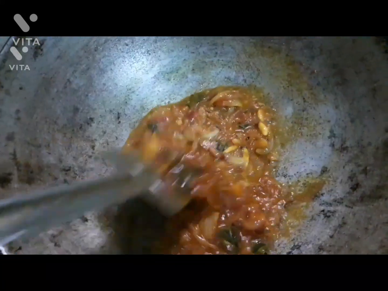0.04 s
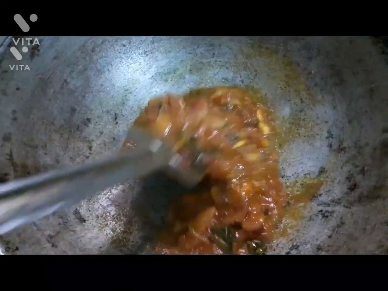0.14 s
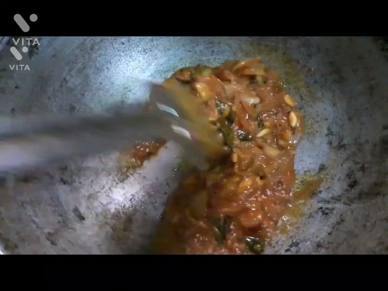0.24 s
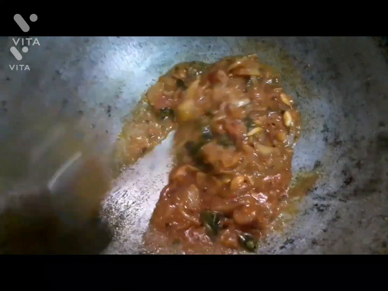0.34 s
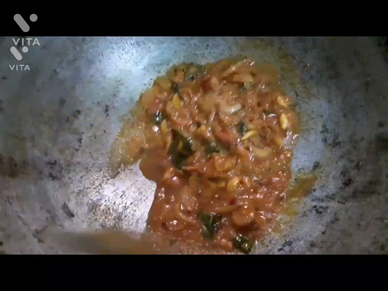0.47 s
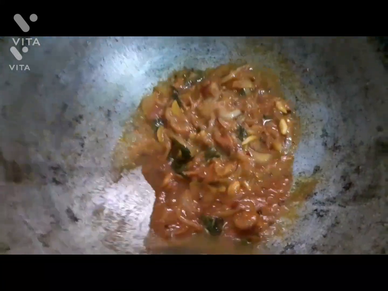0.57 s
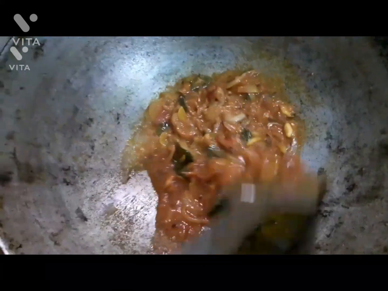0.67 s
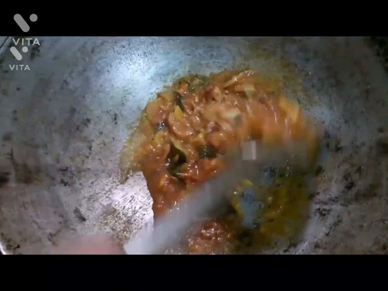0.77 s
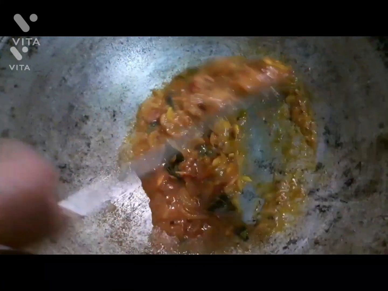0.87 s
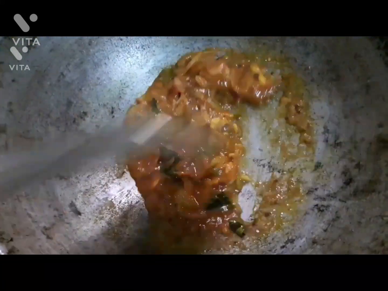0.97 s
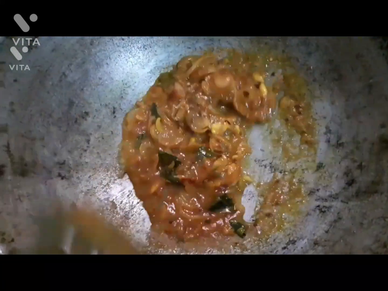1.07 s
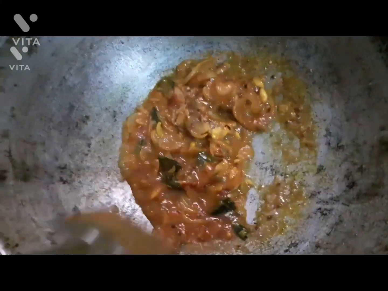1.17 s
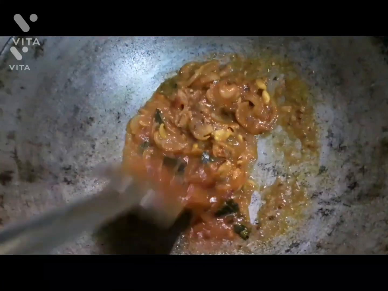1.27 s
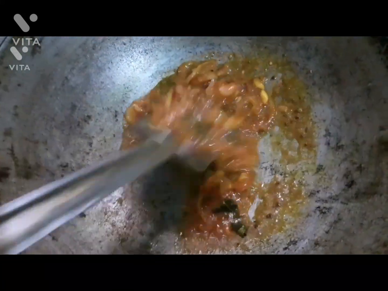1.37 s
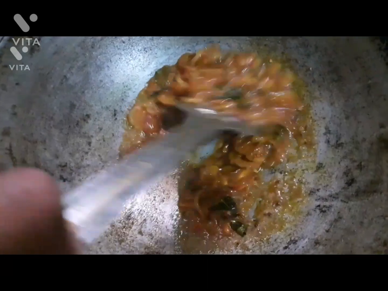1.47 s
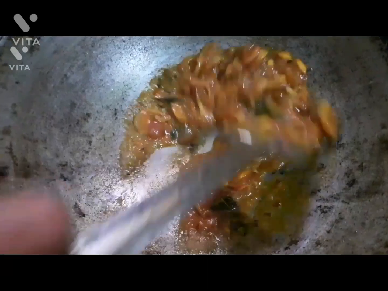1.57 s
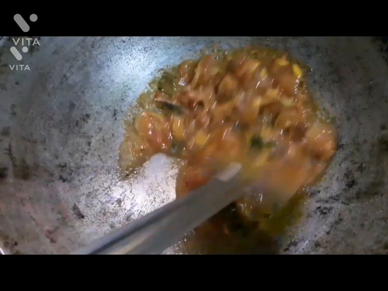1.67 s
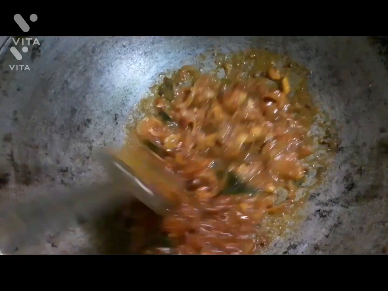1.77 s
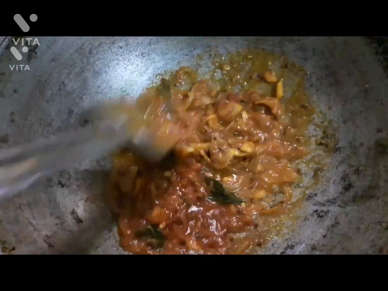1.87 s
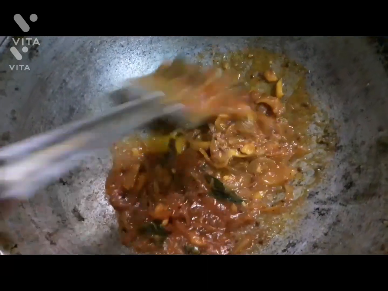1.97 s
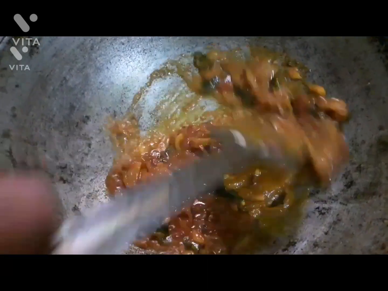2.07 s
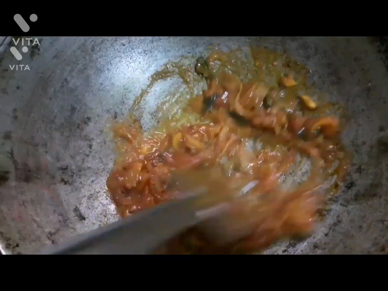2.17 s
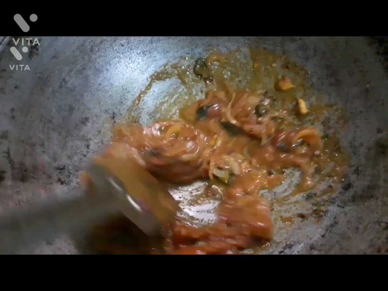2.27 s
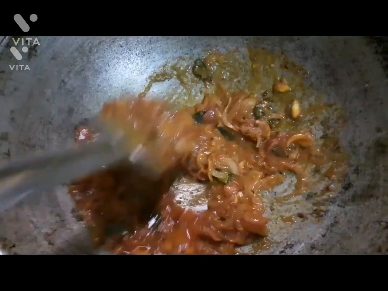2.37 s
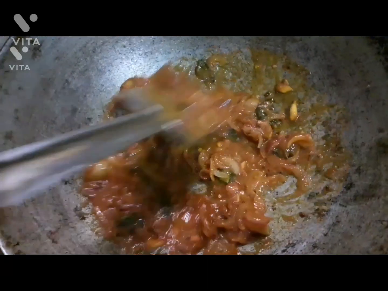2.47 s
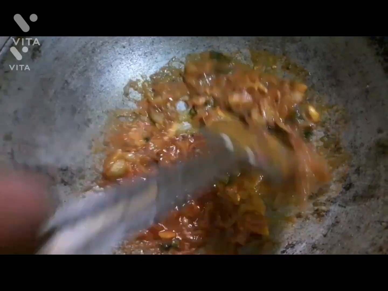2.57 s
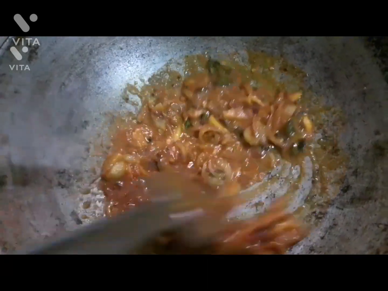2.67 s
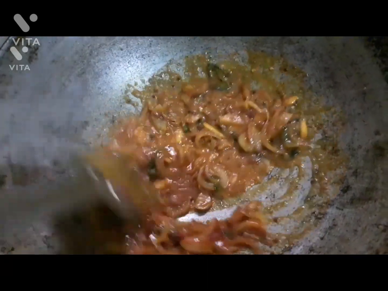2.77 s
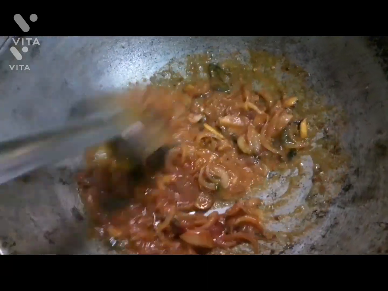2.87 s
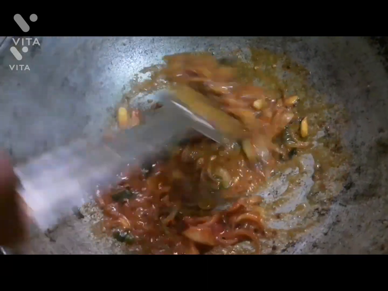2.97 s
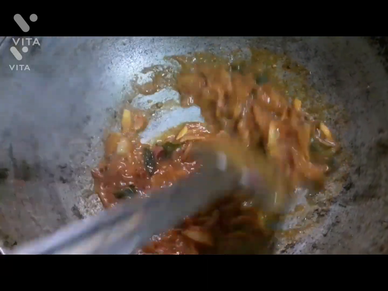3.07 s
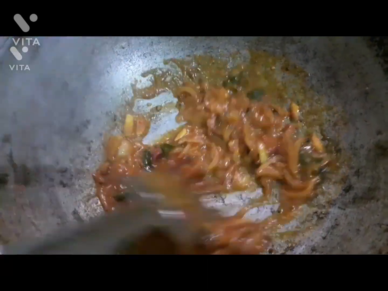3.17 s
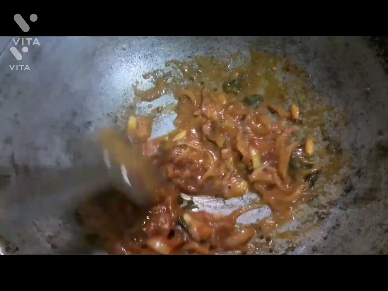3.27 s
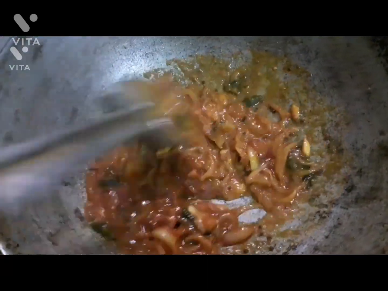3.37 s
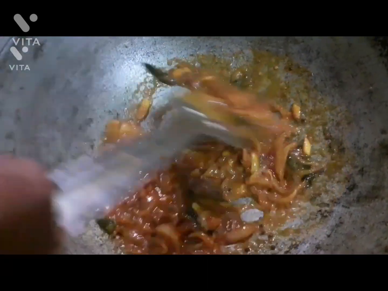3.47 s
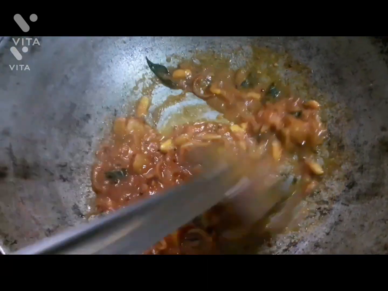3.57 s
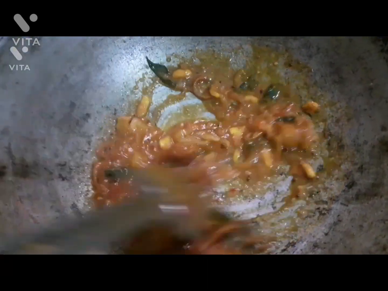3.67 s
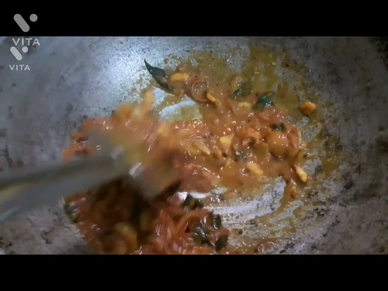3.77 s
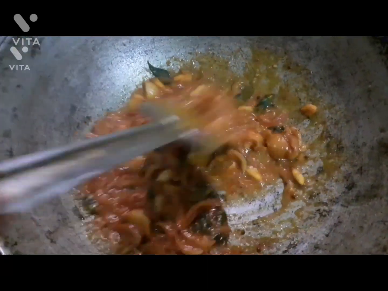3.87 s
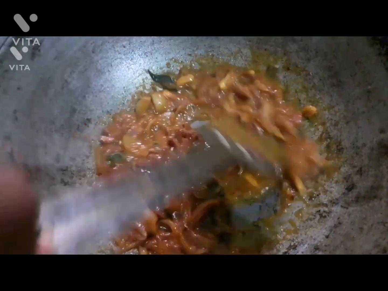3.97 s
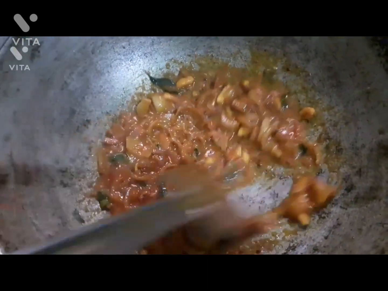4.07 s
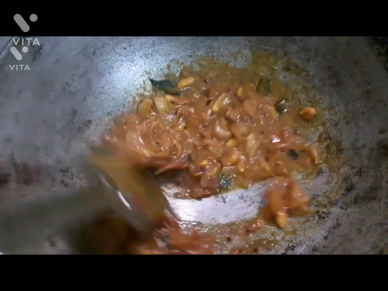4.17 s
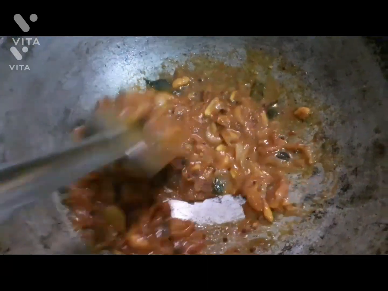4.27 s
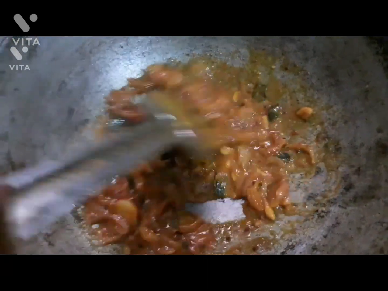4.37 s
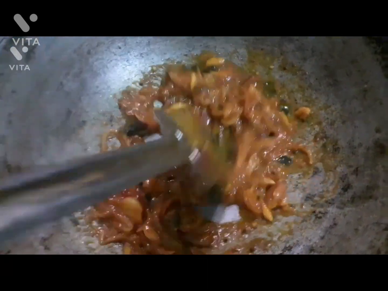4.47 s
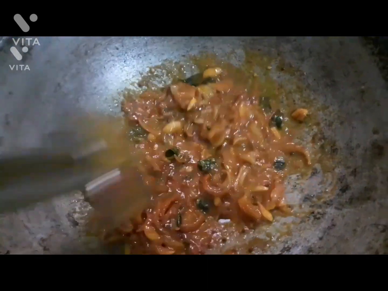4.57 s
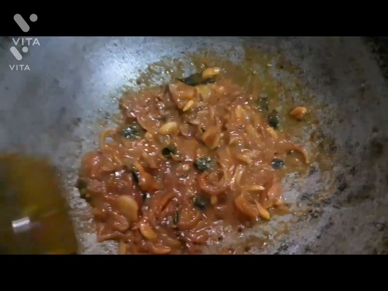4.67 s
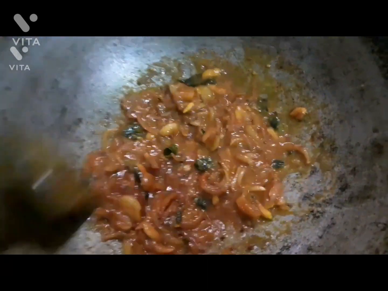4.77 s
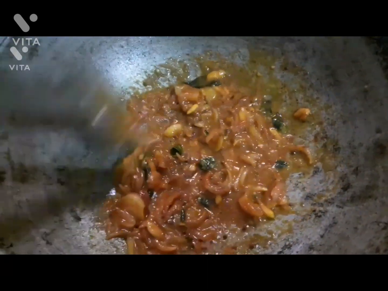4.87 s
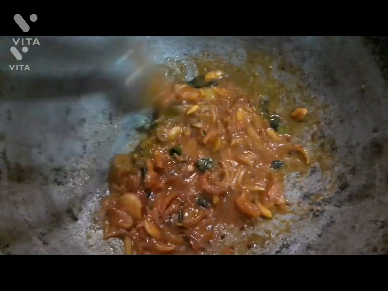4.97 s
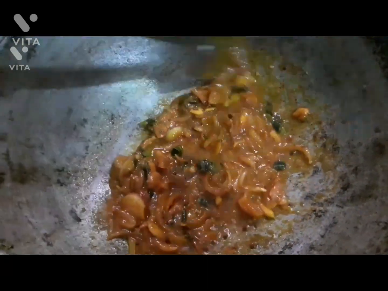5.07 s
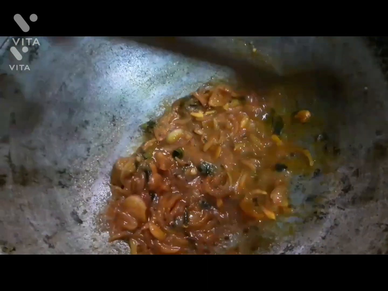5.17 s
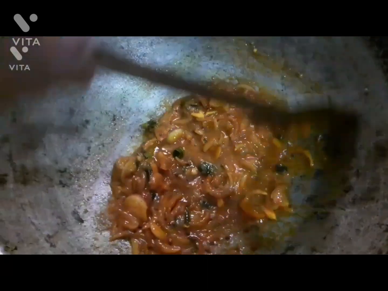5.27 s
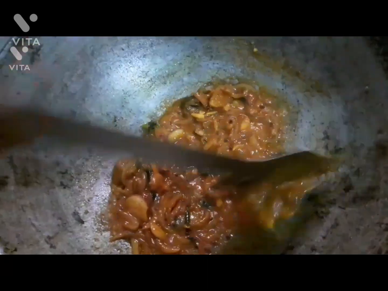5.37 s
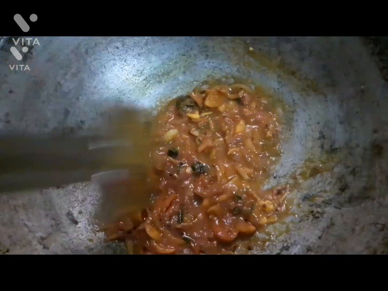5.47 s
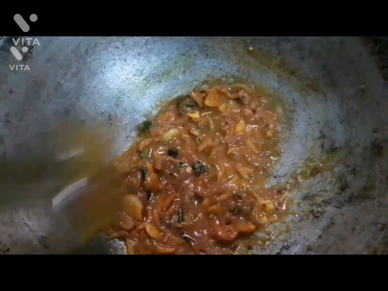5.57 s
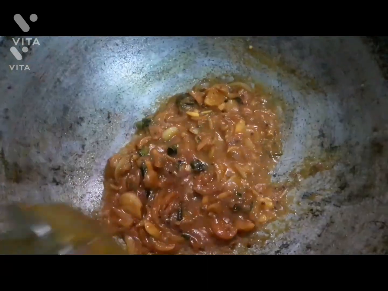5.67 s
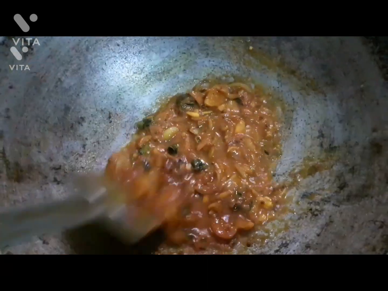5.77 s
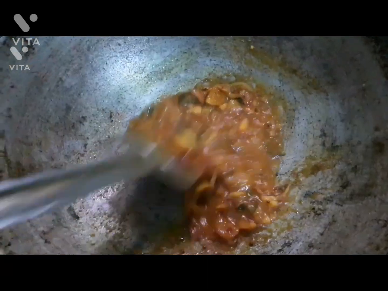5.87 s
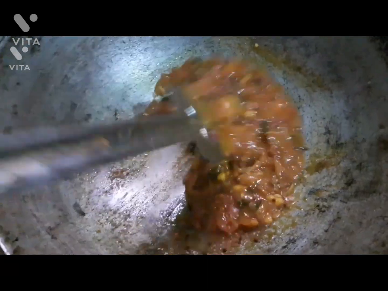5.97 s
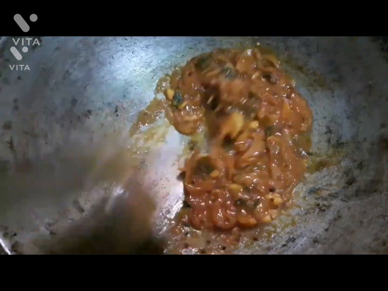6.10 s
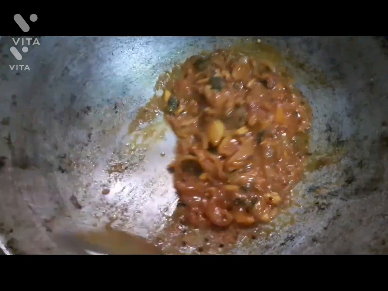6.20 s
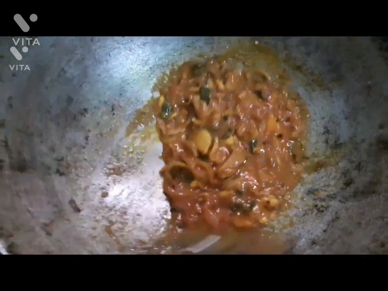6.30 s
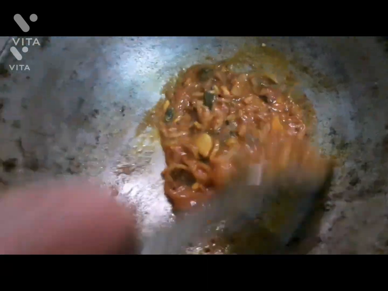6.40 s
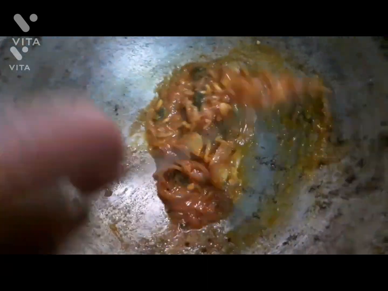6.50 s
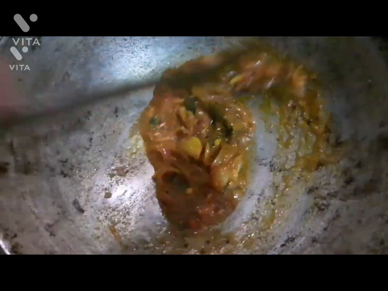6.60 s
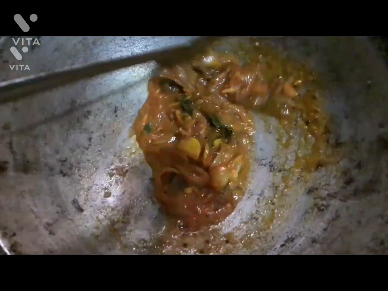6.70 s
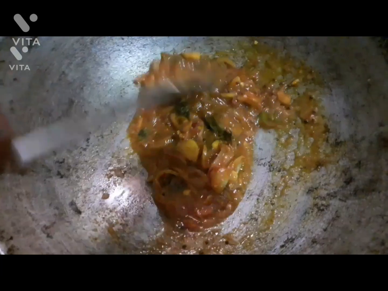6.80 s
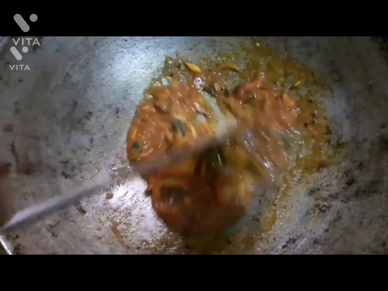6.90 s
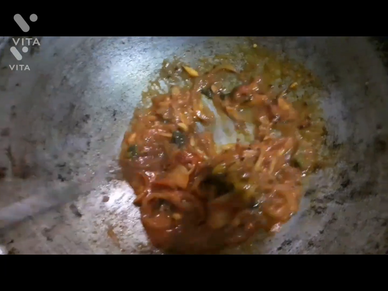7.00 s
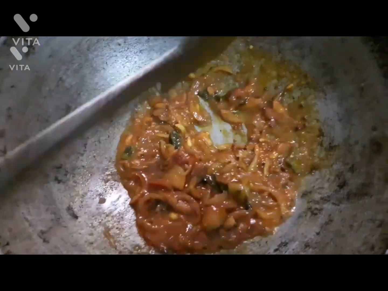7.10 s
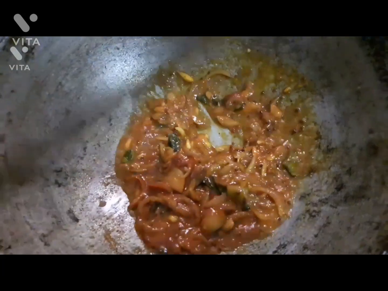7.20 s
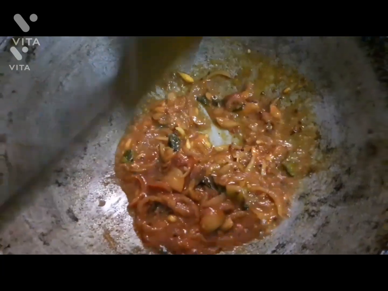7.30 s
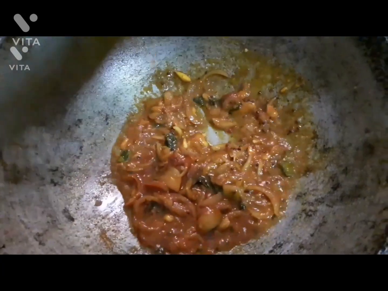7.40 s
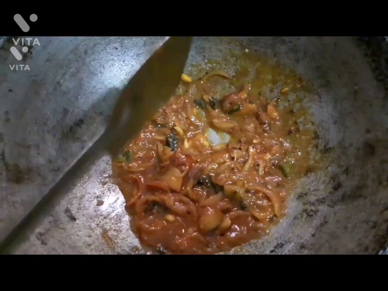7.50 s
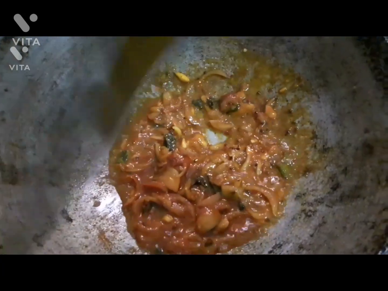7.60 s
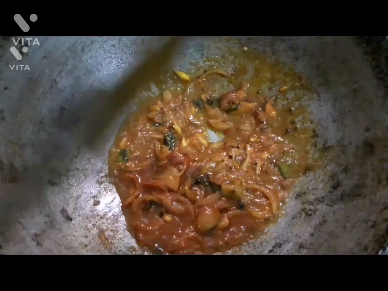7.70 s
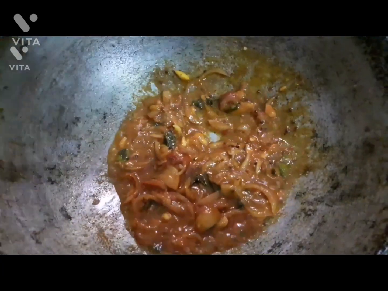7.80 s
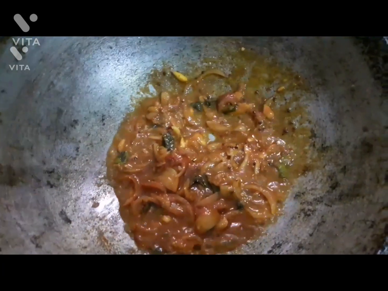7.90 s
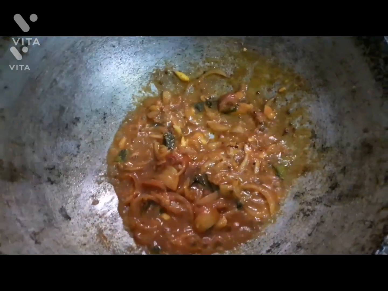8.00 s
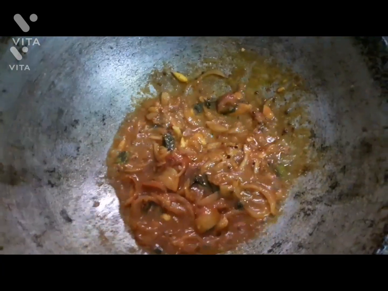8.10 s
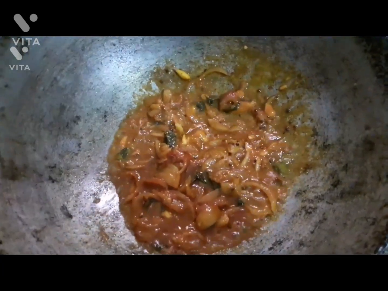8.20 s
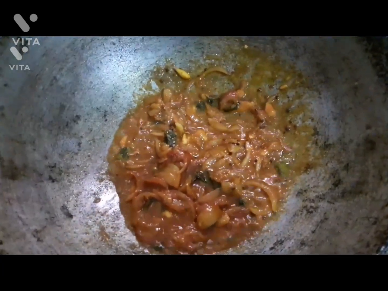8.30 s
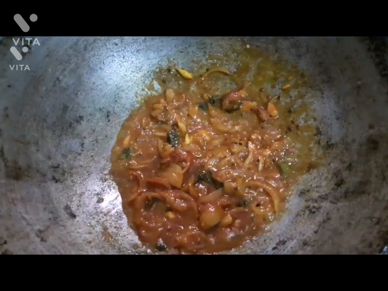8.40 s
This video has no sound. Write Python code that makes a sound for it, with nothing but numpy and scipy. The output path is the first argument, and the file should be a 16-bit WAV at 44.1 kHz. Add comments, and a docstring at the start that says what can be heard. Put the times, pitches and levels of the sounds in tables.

```python
"""Wet spice paste sizzles in a hot wok, heard close through two ports: bubble bursts, clicks and hiss. A steel
spatula drags grit over the metal as noise coloured by the wok's modes, above a low stove rumble. It knocks the
pan (dull push, low modes), clinks on it (crack, thin blade modes), squeaks in gliding tones and twice judders
in stick-slip pulses. Freshly turned paste hisses louder, then settles."""
import sys
import numpy as np
from scipy import signal
from scipy.fft import rfft, irfft, next_fast_len
from scipy.io import wavfile
from scipy.ndimage import uniform_filter1d

SR = 44100
rng = np.random.default_rng(int(sys.argv[2]) if len(sys.argv) > 2 else 0)


def amplitude_ratio(level_db):
    """Convert a level in decibels to the matching linear amplitude (field) ratio."""
    exponent = np.asarray(level_db, float) / 20
    return 10 ** exponent


def digitize_waveform(pressure):
    """Quantize a signal to 16-bit integers and store it at the path in sys.argv[1].

    Rows of a 2-D input are taken as channels; values are limited to [-1, 1].
    """
    field = np.atleast_2d(pressure).T
    bounded = np.clip(field, -1, 1)
    quanta = np.round(bounded * 32767).astype(np.int16)
    wavfile.write(sys.argv[1], SR, quanta)


N = 372644

# Steady frying of the paste. Each row: time in seconds, bursting bubbles in dB, fine fizz in dB.
STEADY_FRYING = [(0.0, -33, -37), (0.3, -37, -41.5), (0.55, -35.5, -41), (1.0, -38.5, -40.5),
                 (1.45, -37, -40), (1.72, -30.5, -39), (1.95, -30, -32.5), (2.15, -29, -33),
                 (2.5, -28.5, -30.5), (3.0, -30.5, -32.5), (3.6, -31.5, -35), (4.0, -30.5, -33),
                 (4.55, -34.5, -34), (4.9, -34, -36), (5.3, -41.5, -41), (5.48, -38, -41),
                 (6.05, -39, -43.5), (6.6, -38.5, -41.5), (7.0, -36.5, -41), (7.5, -35, -41),
                 (8.45, -35, -41.5)]
# Wet paste turned onto hot metal flares up. Each row: start in seconds, rise in seconds, bubbles in dB,
# fizz in dB, fade in dB per second.
FLARES = [(.53, 0.021, -39, -57, 56), (1.2, 0.059, -34, -54, 44), (1.76, 0.029, -22.5, -35.5, 72),
          (2.05, 0.021, -33, -48, 43), (2.24, 0.056, -24, -32, 49), (2.75, 0.033, -24.5, -30, 90),
          (3.18, .05, -30.5, -33.5, 53), (3.5, 0.037, -33, -36, 60), (3.67, 0.069, -28.5, -28.5, 72),
          (4.14, 0.046, -28.5, -44, 54), (4.64, 0.033, -36.5, -36, 30), (5.16, 0.059, -35.5, -43, 37),
          (5.74, 0.048, -35.5, -50, 80), (5.84, 0.021, -41, -51, 108), (6.27, 0.055, -34, -42, 92),
          (6.735, .02, -52, -52, 37), (6.755, 0.029, -36, -48, 67)]
# The blade scrapes over the metal. Each row: start in seconds, rise in seconds, drag into the wok in dB,
# hiss of the edge in dB, fade in dB per second.
SCRAPES = [(.04, 0.03, -43.5, -47, 51), (.37, 0.03, -52, -37, 45), (.6, 0.034, -46, -47, 55),
           (1.05, 0.043, -49, -50, 50), (1.2, 0.078, -48.5, -45, 23), (1.33, 0.044, -47, -58, 40),
           (2.16, 0.058, -48, -40, 50), (2.25, 0.03, -49, -32, 47), (3.7, .05, -52, -47, 40),
           (4.18, 0.064, -52, -35, 66), (4.27, 0.086, -44.5, -55, 47), (4.65, 0.043, -47.5, -40, 33),
           (4.92, 0.061, -41.5, -39.5, 48), (5.03, 0.026, -33.5, -52, 98), (5.1, .04, -45.5, -46, 33),
           (5.52, .02, -46, -39.5, 27), (5.7, 0.083, -49, -35.5, 93), (5.83, 0.043, -42, -62, 54),
           (6.12, 0.11, -47, -38.5, 45), (6.3, 0.044, -45.5, -53, 58), (6.73, 0.0074, -37.5, -37, 72),
           (6.77, 0.022, -55, -59, 43)]
# The stove is jolted and rumbles. Each row: start in seconds, level in dB.
STOVE_JOLTS = [(.06, -52), (.35, -50), (.59, -49), (.9, -63), (1.03, -53), (1.17, -69), (1.37, -53),
               (1.71, -53), (1.79, -51), (2.19, -51), (2.45, -58), (2.68, -59), (2.91, -53), (3.14, -56),
               (3.22, -60), (3.45, -61), (3.6, -55), (3.88, -53), (4.05, -53), (4.25, -52), (4.36, -59),
               (4.48, -53), (4.62, -49.5), (4.8, -68), (4.94, -55), (5.03, -54), (5.15, -55), (5.25, -59),
               (5.36, -58), (5.5, -47), (5.65, -58), (5.84, -49), (6.09, -50), (6.22, -53), (6.36, -54),
               (6.71, -58), (6.9, -58), (7.3, -65), (7.78, -73), (7.9, -63), (8.03, -73)]
# The wok is knocked on its stand. Each row: start in seconds, peak in dB, centre of the ring in Hz,
# spread in octaves, rise in seconds, ring time as a factor on t60.
KNOCKS = [(0.109, -30.5, 397, 0.73, 0.0097, 1.1), (0.377, -31, 380, 0.82, 0.0016, 0.73),
          (0.61, -29.5, 600, 0.4, 0.0026, 0.49), (1.045, -36, 368, 0.92, 0.0045, 1.1),
          (1.365, -34, 263, 1.2, 0.0053, 0.56), (1.795, -28.5, 550, 0.39, 0.0061, 1),
          (3.374, -26.5, 880, 0.12, 0.0047, 0.36), (3.631, -38, 417, .3, 0.0032, 0.34),
          (4.284, -44, 660, .5, .003, .8), (4.641, -34, 405, 0.81, 0.011, 1.1),
          (4.748, -36, 690, 0.78, 0.0064, 0.68), (5.085, -32.5, 350, .3, .01, .5),
          (5.13, -38, 383, .15, .03, .6), (5.245, -36.5, 388, .2, 0.0096, .3),
          (5.514, -32.5, 380, 0.52, 0.0025, 2.4), (5.889, -29.5, 408, 0.82, 0.0028, 0.5),
          (5.892, -30, 1350, 0.4, 0.003, 0.21), (6.114, -37.5, 317, 0.32, 0.0033, 0.89),
          (6.7301, -9, 895, 0.92, 0.00031, 0.2), (6.739, -28, 550, .8, 0.011, .5)]
# The blade edge strikes the pan. Each row: start in seconds, peak in dB, centre of the ring in Hz,
# spread in octaves, crack against the ring in dB, ring time as a factor on t60.
CLINKS = [(0.3778, -14.5, 11800, 0.45, -1, .8), (0.3783, -13.5, 3500, 0.65, 5, 0.5),
          (0.61, -20, 4600, .7, 11, .6), (1.052, -19, 3980, 0.96, 10, .5), (1.235, -22, 4730, 0.2, 3, 0.62),
          (4.6476, -12.5, 5600, 0.67, 6, 0.88), (4.679, -15, 5400, 0.49, 3, .5),
          (4.727, -21, 4800, 0.23, -2, .7), (4.998, -20.5, 4900, 0.52, -7, 0.75),
          (5.516, -5, 7300, 1.7, -2, 0.74), (6.119, -7.5, 8200, 1.6, 5.5, 1),
          (6.73, -12, 4770, 0.71, 3, 0.33), (6.819, -19, 3500, 0.4, 4, .4)]
# The blade sings as it slides, one list a squeak. Each row: time in seconds, pitch in Hz, rms level in dB.
SQUEAKS = [
    [(4.90, 1156, -40), (4.925, 1198, -38), (4.95, 1197, -37), (4.968, 1100, -39), (4.99, 1040, -36),
     (5.003, 900, -38), (5.02, 740, -36), (5.04, 680, -43)],
    [(4.905, 856, -48), (4.93, 880, -43), (4.955, 880, -50)],
    [(5.11, 1148, -42), (5.13, 1253, -38), (5.155, 1148, -40), (5.178, 1288, -38), (5.2, 1152, -41),
     (5.25, 1106, -43)],
    [(5.115, 2635, -39), (5.13, 2640, -32), (5.142, 2644, -36), (5.153, 2670, -29.5), (5.175, 2740, -39),
     (5.192, 2810, -36), (5.21, 2870, -30.5), (5.25, 2790, -39)],
    [(5.765, 3670, -45), (5.785, 3860, -33), (5.815, 3920, -43)],
    [(5.85, 3500, -46), (5.875, 3700, -32), (5.915, 3770, -43)],
]
# The blade chatters over bare metal, slowly low in the bowl, then fast on the near wall. Each row: start in
# seconds, length in seconds, rms level in dB, slips per second at the slowest before unevenness, added
# left-right tilt in dB, unevenness, grit between slips (0-1), ring of the bowl in dB.
JUDDERS = [(5.026, .075, -27, 215, 4.5, .3, 0.012, 1.5), (6.343, 0.043, -22, 1300, 32, 7.3, 0.9, -28)]
# Colour of each judder, one list for each row above. Each row: frequency in Hz, level in dB.
JUDDER_COLOURS = [
    [(40, -73), (120, -22), (200, -7.5), (340, -6), (500, -1), (650, -1), (900, 1), (1250, 2.5),
     (1450, 0.5), (1650, 6), (2000, -23), (4000, -46), (16000, -68)],
    [(60, -75), (250, -23), (600, -12), (800, -3), (1000, -5.5), (1400, 2), (1650, -2), (1900, -1.5),
     (2500, 1.2), (3300, 0), (4500, -9.5), (6000, -14), (7500, -52), (16000, -47)],
]
# Ringing modes of the blade, then of the wok. Each row: pitch in Hz, relative level in dB, t60 in seconds.
BLADE_MODES = [(2900, -8, .05), (3720, -6, .05), (4800, -4, .06), (5380, 3, .1), (5720, 2, .12),
               (6035, 5, .075), (6310, 4, .06), (6650, 2, .075), (7100, -3, .08), (8090, 2, .05),
               (9390, -3, .15), (9535, 2, .18), (11900, -5, .07), (12320, 5, .065), (12810, 2, .05),
               (13900, 0, .03)]
WOK_MODES = [(123, 0, 0.36), (225.3, -2, 0.6), (261.7, 5, 0.37), (346, -12, 0.78), (380, -0.5, 0.39),
             (413, -1, 0.35), (483, -4.5, 0.059), (550, -8.5, 0.094), (641.4, -1.5, 0.12), (690, -8, 0.19),
             (883, -4, 0.28), (1006, -1.5, 0.26), (1120, -5.5, 0.12), (1252, 1.5, 0.16), (1326, 1, 0.24),
             (1470, 1, 0.18), (1615, 5, 0.22)]
# The bowl lifts and dents the sizzle inside it. Each row: centre in Hz, width in Hz, lift in dB.
HOLLOW_BUMPS = [(825, 20, 1), (1358, 140, 4), (1630, 90, -3.5), (2452, 243, 4.5), (3050, 334, 4.5),
                (3615, 114, 4.5), (4050, 930, 1.5), (4900, 170, 1.4), (6300, 240, -3)]
# Colour of each channel; the left peaks near 3.2 kHz and has a deep gap near 8.2 kHz. Each row: frequency in
# Hz, level in dB.
LEFT_COLOUR = [(30, -26), (80, -25.5), (200, -22), (600, -11), (1300, -8.5), (1900, -5), (2500, -4.5),
               (3200, -0.5), (3900, -2.5), (5000, -8), (6500, -15), (7500, -23), (8250, -61), (9100, -24.5),
               (12000, -16), (15700, -14.5)]
RIGHT_COLOUR = [(30, -34), (80, -32), (200, -25), (600, -15), (1300, -13.5), (2500, -15.5), (3200, -19),
                (4500, -12.5), (6500, -14), (7600, -15), (8500, -18), (9200, -13.5), (15700, -12.5)]
# How alike the ports hear. Each row: frequency in Hz, left-right likeness (0-1).
PORT_LIKENESS = [(60, 0.57), (300, 0.88), (900, 0.72), (1800, 0.19), (3500, 0.093), (5500, 0.21),
                 (6500, 0.14), (7300, 1), (8200, 0.4), (9400, 0.91), (13200, 0.68), (15500, 0.53)]
# Phase between the channels. Each row: frequency in Hz, turns by which the left leads up to about 6 kHz; from
# 6.6 kHz a whole turn, so both are in step.
LEFT_LEAD = [(100, .01), (1000, .11), (2400, .35), (5000, .5), (6000, .6), (6600, 1), (16000, 1)]

SPIT_DB = -11  # spitting, relative to the fizz
SQUELCH_DB = -3  # paste squelching as the blade drags, relative to the drag
CALM_DB = -34.5  # level of the bursts at which bubbling and murmur have their own levels
BUBBLING_DB, BUBBLING_SHARE = -45.5, 0.59  # low bubbling follows the bursts by this share in dB
MURMUR_DB, MURMUR_SHARE = -50, 0.81  # so does the murmur of the bowl
JOLT_RISE_S, JOLT_FADE_DB_PER_S, STOVE_DB = 0.034, 135, -73
SQUEAK_WIDTH_HZ = 170  # width of the shiver in a squeak
SQUEAK_PURE, PURE_HZ = 0.5, 1150  # steady part of a squeak at this mean pitch; higher ones are purer, up to 1


def read(points, hz):
    """Reads a spectrum table at the given frequencies, along log frequency."""
    f, value = np.transpose(points)
    return np.interp(np.log(hz + 1), np.log(f + 1), value)


def curve(rows):
    """Turns every dB column of a timed table into a gain for each sample."""
    s, *columns = np.transpose(rows)
    t = np.arange(N) / SR
    return [amplitude_ratio(np.interp(t, s, column)) for column in columns]


def evened(pair):
    """Scales a pair so that its middle has rms 1."""
    return pair / np.sqrt(np.mean(pair.mean(0) ** 2) + 1e-20)


def peaked(pair, db):
    """Scales a pair so that its middle peaks at db."""
    return amplitude_ratio(db) * pair / (abs(pair.mean(0)).max() + 1e-12)


def add(mix, s, pair):
    """Mixes a short pair in at time s."""
    part = mix[:, round(s * SR):][:, :pair.shape[1]]
    part += pair[:, :part.shape[1]]


def above(hz, edge_hz):
    """Power share above a soft crossover."""
    return 1 / (1 + (edge_hz / (hz + 1)) ** 8)


def ports(paths, shape=lambda hz: 1):
    """Two paths of one sound become left and right, each with its colour, sharing part of what they carry."""
    length = paths.shape[1]
    size = next_fast_len(length + 2048)
    hz = np.fft.rfftfreq(size, 1 / SR)
    first, second = rfft(np.pad(paths, ((0, 0), (256, 0))), size)
    same = np.clip(read(PORT_LIKENESS, hz), -1, 1)
    lag = np.exp(-2j * np.pi * read(LEFT_LEAD, hz))
    left = first * amplitude_ratio(read(LEFT_COLOUR, hz))
    right = (same * first * lag + np.sqrt(1 - same ** 2) * second) * amplitude_ratio(read(RIGHT_COLOUR, hz))
    return irfft(np.array([left, right]) * shape(hz), size)[:, 256:256 + length]


def swells(start, rise, db, fade):
    """Summed power of events whose gain rises in a straight line, then fades by so many dB a second."""
    t = np.arange(0, N + 64, 64) / SR - np.asarray(start)[:, None]
    rise, db, fade = (np.reshape(v, (-1, 1)) for v in (rise, db, fade))
    ramp = np.clip(t / np.maximum(rise, 0.002), 0, 1)
    gain = ramp * amplitude_ratio(db - fade * np.maximum(t - rise, 0))
    return np.interp(np.arange(N), np.arange(t.shape[1]) * 64, (gain ** 2).sum(0))


def waver(depth_db, top_hz):
    """A gain that drifts by depth_db rms: 24 slow sines at random phases, up to top_hz."""
    hz = np.geomspace(1.5, top_hz, 24)[:, None]
    t = np.arange(0, N + 64, 64)
    drift = np.sin(2 * np.pi * (hz * t / SR + rng.random((24, 1)))).sum(0)
    return amplitude_ratio(depth_db * np.interp(np.arange(N), t, drift / drift.std()))


def pop_sizes(per_s, spread_db):
    """Random moments of random size: mostly small, a few large."""
    return amplitude_ratio(spread_db * np.minimum(rng.exponential(1, N), 4)) * (rng.random(N) < per_s / SR)


def ticks(per_s, spread_db):
    """Single-sample clicks, each path with its own signs."""
    return pop_sizes(per_s, spread_db) * rng.choice([-1., 1.], (2, N))


def body(hz):
    """The wok's modes as one response, a sum of resonances."""
    return sum(amplitude_ratio(db) / (1 + 2j * (hz - f) * t60 / 7) for f, db, t60 in WOK_MODES)


def rings(modes, t, centre_hz, octaves, longer, scatter_db):
    """Struck modes decay together, strongest near centre_hz; the second path has its own phases."""
    hz, db, t60 = np.transpose(modes)[:, :, None]
    phase, scatter = rng.random((2, 40, 1))[:, :len(modes)]
    level_db = db - 6 * np.log2(hz / centre_hz) ** 2 / octaves ** 2 + scatter_db * (scatter - 0.5)
    level = amplitude_ratio(level_db - 60 * t / (t60 * longer))
    return np.array([(level * np.sin(2 * np.pi * (hz * t + c))).sum(0) for c in (0, phase)])


def frying():
    """Gains of bubbles and fizz: the power of steady frying plus that of the flares."""
    start, rise, *levels_db, fade = np.transpose(FLARES)
    pairs = zip(curve(STEADY_FRYING), levels_db)
    return [np.sqrt(steady ** 2 + swells(start, rise, db, fade)) for steady, db in pairs]


def bubbles(per_s, cycles, spread_db):
    """Bubbles of 32 sizes: short damped tones that rise as they burst, on both paths a moment apart."""
    size = pop_sizes(per_s, spread_db)
    kind = np.floor(32 * rng.random(N) ** 0.6)
    out = np.zeros((2, N + 4096))
    for k, hz in enumerate(np.geomspace(800, 15500, 32)):
        turns = np.arange(0, 3 * cycles, hz / SR)
        tone = np.sin(2 * np.pi * turns * (1 + 0.0104 * turns))
        pop = np.exp(-turns / cycles * 2) * np.minimum(turns, 1) * tone * hz ** 1.02
        train = signal.oaconvolve(size * (kind == k), pop)[:N]
        late = rng.integers(20, 300)  # samples
        out[0, :N] += train
        out[1, late:late + N] += train
    return out[:, :N]


def patchy(pair, patch_db):
    """Narrow random patches of the spectrum come and go within tens of milliseconds."""
    z = signal.stft(pair, nperseg=512, noverlap=384)[2]
    patches = rng.standard_normal(z.shape[1:])
    patches = uniform_filter1d(uniform_filter1d(patches, 8, 1), 2, 0)  # along time, then frequency
    z = z * amplitude_ratio(patch_db * patches / patches.std())
    return signal.istft(z, nperseg=512, noverlap=384)[1][:, :N]


def hollow(hz, ripple_db):
    """Broad bumps of the bowl, and a fine steady ripple from echoes off pan and walls."""
    bumps_db = sum(db * np.exp(-((hz - f) / width) ** 2) for f, width, db in HOLLOW_BUMPS)
    return amplitude_ratio(bumps_db + np.interp(hz, np.linspace(0, SR / 2, len(ripple_db)), ripple_db))


def sizzle():
    """Steam bubbles burst by the thousand over a bed of hiss; the scraping edge adds to the spitting."""
    burst, fizz = frying()
    start, rise, drag_db, edge_db, fade = np.transpose(SCRAPES)
    spit = np.sqrt((amplitude_ratio(SPIT_DB) * fizz) ** 2 + swells(start, rise, edge_db, fade))
    spit = spit * waver(depth_db=2.5, top_hz=14)
    bubbling = amplitude_ratio(BUBBLING_DB) * (burst / amplitude_ratio(CALM_DB)) ** BUBBLING_SHARE
    bubbling = bubbling * waver(depth_db=-0.45, top_hz=25.7)
    bubbling = np.sqrt(bubbling ** 2 + swells(start, rise, drag_db + SQUELCH_DB, fade))
    burst = burst * waver(depth_db=0.38, top_hz=14)
    fizz = fizz * waver(depth_db=1.5, top_hz=14)

    hiss = patchy(rng.standard_normal((2, N)), patch_db=2.5)
    oil = amplitude_ratio(-2) * evened(hiss)
    oil = oil + amplitude_ratio(-19) * evened(ticks(per_s=2500, spread_db=2.2))
    oil = oil + amplitude_ratio(-5) * evened(bubbles(per_s=8000, cycles=11, spread_db=2.76))
    ripple_db = 2.4 * uniform_filter1d(rng.standard_normal(2000), 4)

    def layer(low_hz, top_hz):
        """One band of the oil, through the bowl and the ports."""
        def band(hz):
            return hollow(hz, ripple_db) * np.sqrt(above(hz, low_hz) * (1 - above(hz, top_hz)))
        return evened(ports(oil, band))

    low = bubbling * layer(800, 1950) + burst * layer(1950, 5500)
    return low + spit * layer(5500, 8400) + fizz * layer(8400, 30000)


def drag():
    """Grit under the blade shakes the wok's modes over a dull scrape; the stove below rumbles."""
    start, rise, drag_db, _, fade = np.transpose(SCRAPES)
    burst = curve(STEADY_FRYING)[0]
    murmur = amplitude_ratio(MURMUR_DB) * (burst / amplitude_ratio(CALM_DB)) ** MURMUR_SHARE * waver(depth_db=2.0, top_hz=10)
    scrape = np.sqrt(murmur ** 2 + swells(start, rise, drag_db, fade))
    start, db = np.transpose(STOVE_JOLTS)
    idle = amplitude_ratio(STOVE_DB) * waver(depth_db=-3.0, top_hz=8.6)
    rumble = np.sqrt(idle ** 2 + swells(start, JOLT_RISE_S, db, JOLT_FADE_DB_PER_S))

    def bowl_band(hz):
        return (abs(body(hz)) + 0.29) * above(hz, 218) * np.sqrt(1 - above(hz, 986))

    def stove_band(hz):
        return np.sqrt(1 - above(hz, 245)) * np.sqrt(above(hz, 45))

    grit = amplitude_ratio(-6) * evened(ticks(per_s=1500, spread_db=3.0)) + rng.standard_normal((2, N))
    bowl = ports(grit, bowl_band)
    stove = ports(rng.standard_normal((2, N)), stove_band)
    flame = ports(rng.standard_normal((2, N)), lambda hz: 1 / (1 + ((hz - 124) / 12) ** 2))  # burner hum
    return scrape * evened(bowl) + rumble * evened(stove) + amplitude_ratio(-74) * evened(flame)


def knock(db, centre_hz, octaves, rise, longer):
    """A dull push, weaker where few modes are struck, with the low modes of the bowl ringing after it."""
    t = np.arange(SR // 3) / SR
    onset = np.minimum(t / max(rise, 1e-4), 1)
    push = rng.standard_normal((2, len(t))) * (amplitude_ratio(-60 * t / 0.0039) + amplitude_ratio(-18 - 60 * t / 0.16))
    snap = amplitude_ratio(15 - 60 * t / 0.00092) * np.sin(2 * np.pi * centre_hz * t)

    def dull(hz):
        low_cut = np.sqrt(above(hz, centre_hz / 2 ** (octaves + 0.61)))
        return low_cut / (1 + (hz / centre_hz / 2 ** octaves) ** 4)

    thud = peaked(ports((push + snap) * onset, dull), 6 * np.log2(min(octaves / 0.75, 1)))
    ring = peaked(ports(rings(WOK_MODES, t, centre_hz, octaves, longer, scatter_db=1.5) * onset), 0)
    thin = signal.butter(2, 0.23 * centre_hz, "highpass", fs=SR, output="sos")
    return peaked(signal.sosfilt(thin, thud + ring), db)


def clink(db, centre_hz, octaves, crack_db, longer):
    """A sharp crack, a noisy tail from the kitchen walls that soon dulls, and the thin ring of the blade."""
    t = np.arange(SR // 4) / SR
    noise = rng.standard_normal((2, len(t)))
    dull = signal.sosfilt(signal.butter(1, 7000, fs=SR, output="sos"), noise)
    crack = noise * (amplitude_ratio(20.5 - 60 * t / 0.0055) + amplitude_ratio(-1 - 60 * t / 0.03))
    crack = crack + dull * amplitude_ratio(8.5 - 60 * t / 0.14)
    crack = ports(crack, lambda hz: amplitude_ratio(-2.5 * np.log2((hz + 1) / centre_hz) ** 2 / octaves ** 2))
    ring = ports(rings(BLADE_MODES, t, centre_hz, octaves, longer, scatter_db=6))
    onset = np.minimum(t / 0.00093, 1)
    return peaked((peaked(crack, crack_db) + peaked(ring, 0)) * onset, db)


def squeak(rows):
    """A gliding tone whose strength and phase shiver with narrow noise."""
    s, hz, db = np.transpose(rows)
    t = np.arange(s[0], s[-1], 1 / SR)
    r = np.exp(-np.pi * SQUEAK_WIDTH_HZ / SR)
    noise = rng.standard_normal((2, len(t))) + 1j * rng.standard_normal((2, len(t)))
    fuzz = signal.lfilter([1], [1, -2 * r, r * r], noise)
    pure = min(SQUEAK_PURE * hz.mean() / PURE_HZ, 1)
    glide = np.exp(2j * np.pi * np.cumsum(np.interp(t, s, hz)) / SR)
    tone = ((pure + fuzz / fuzz.std()) * glide).real
    return evened(ports(tone)) * amplitude_ratio(np.interp(t, s, db)) * signal.windows.tukey(len(t), 0.1)


def judder(length, db, per_s, lean_db, uneven, grit, ring_db, colour):
    """Uneven stick-slip pulses under a swell that rises fast, heard through the part of the pan beneath."""
    t = np.arange(round(SR * (length + 0.073))) / SR
    done = np.minimum(t / length, 1)
    hurry = 1 + 3.25 * (2 * done - 0.78) ** 2  # slips are slowest a little before the middle
    wander = np.exp(uneven * uniform_filter1d(rng.standard_normal(len(t)), 150))
    turns = np.cumsum(per_s * hurry / SR * wander)
    slips = np.diff(np.floor(turns), prepend=0) * rng.uniform(0.65, 1, len(t))
    swell = np.sin(np.pi * done ** 0.69) ** 1.25
    echo = rng.standard_normal((2, 3000)) * amplitude_ratio(-31 - 60 * np.arange(3000) / SR / 0.04)
    echo[:, [0, 12]] = np.eye(2)  # direct sound, 12 samples later on the second path
    pulses = (slips + grit * rng.standard_normal(len(t))) * swell
    drive = signal.fftconvolve(pulses[None], echo, axes=1)[:, :len(t)]

    def pan(hz):
        """The judder's colour takes the place of the left channel's own."""
        return amplitude_ratio(read(colour, hz) - read(LEFT_COLOUR, hz)) * (1 + amplitude_ratio(ring_db) * body(hz) * above(hz, 310))

    return amplitude_ratio(db) * evened(ports(drive, pan) * amplitude_ratio([[lean_db / 2], [-lean_db / 2]]))


def scene():
    """Frying and dragging run throughout; knocks, clinks, squeaks and judders are laid on top."""
    mix = sizzle() + drag()
    for play, table in ((knock, KNOCKS), (clink, CLINKS)):
        for s, *row in table:
            add(mix, s, play(*row))
    for rows in SQUEAKS:
        add(mix, rows[0][0], squeak(rows))
    for (s, *row), colour in zip(JUDDERS, JUDDER_COLOURS):
        add(mix, s, judder(*row, colour))
    return mix


def roll_off(x):
    """The treble ends steeply here."""
    return signal.sosfilt(signal.butter(12, 16970, fs=SR, output="sos"), x)


def record(dry):
    """The preamp rounds off the loudest peaks; a bass cut and a steep treble limit follow."""
    round_top = 1.1 * np.tanh(dry / 1.1)
    thin = signal.sosfilt(signal.butter(2, 55, "highpass", fs=SR, output="sos"), round_top)
    treble_limit = signal.firwin(511, 15900, window=("kaiser", 9), fs=SR)
    finished = signal.oaconvolve(thin, treble_limit[None], "same")
    return roll_off(finished)


dry = scene()
out = record(dry)
digitize_waveform(out)
```